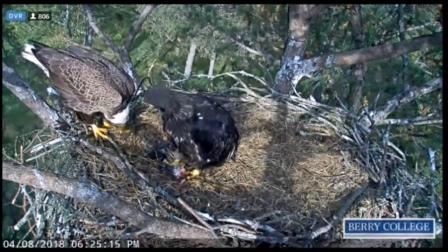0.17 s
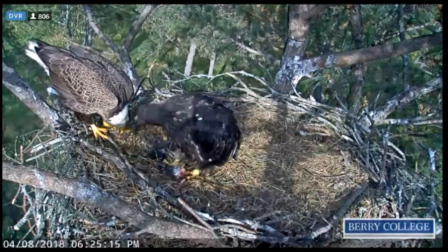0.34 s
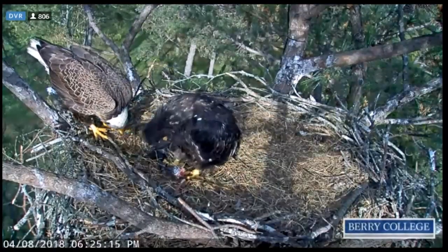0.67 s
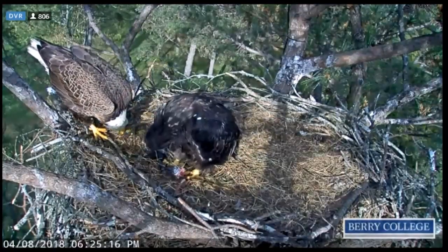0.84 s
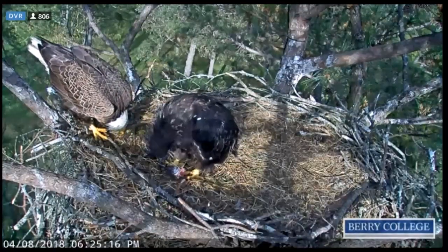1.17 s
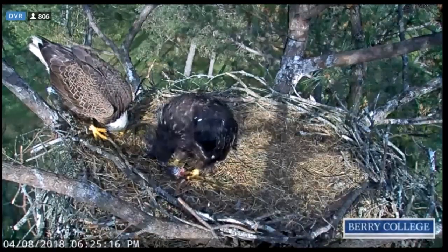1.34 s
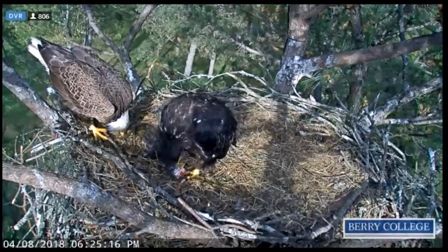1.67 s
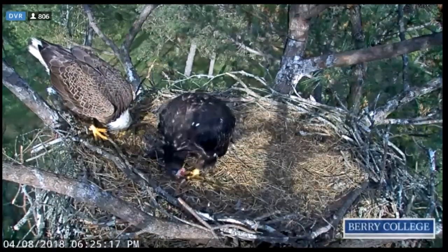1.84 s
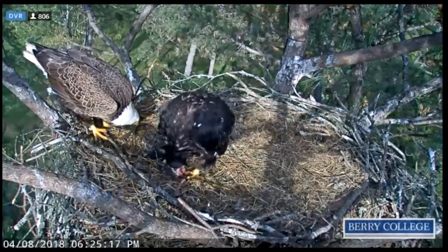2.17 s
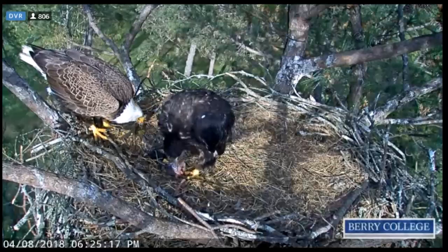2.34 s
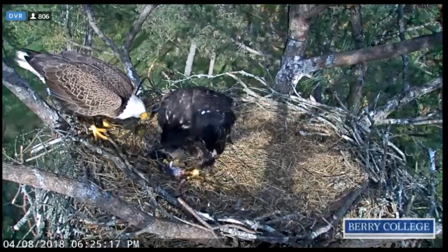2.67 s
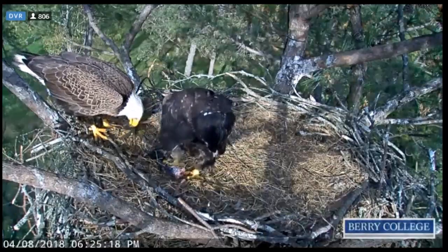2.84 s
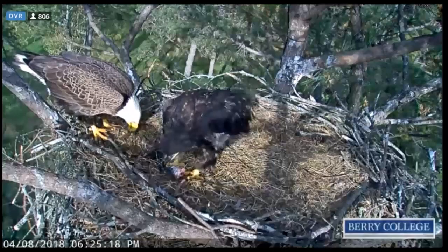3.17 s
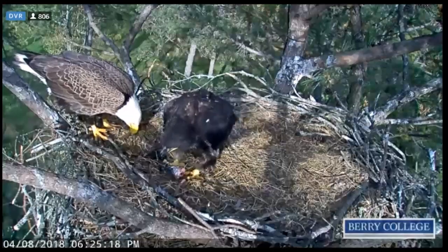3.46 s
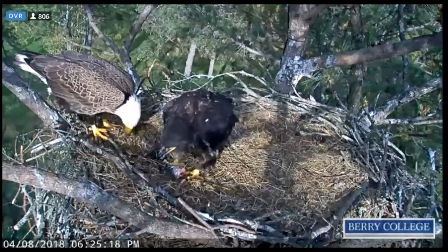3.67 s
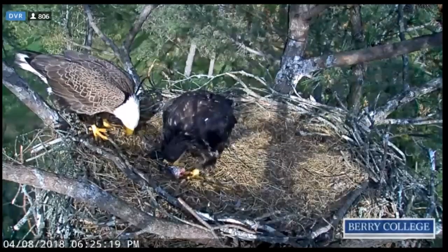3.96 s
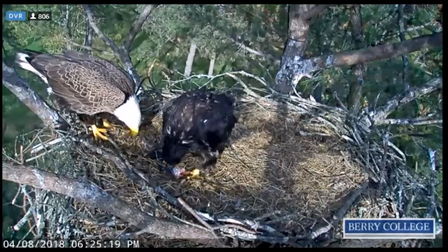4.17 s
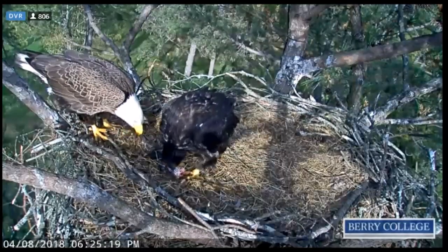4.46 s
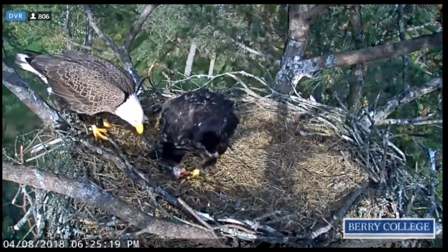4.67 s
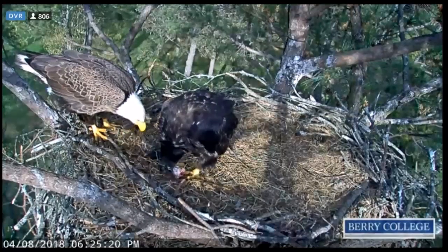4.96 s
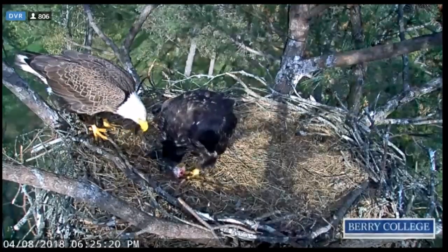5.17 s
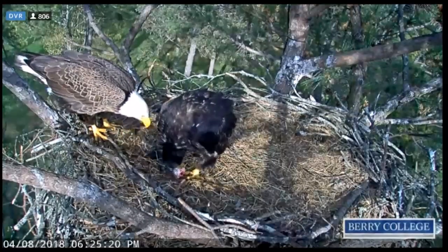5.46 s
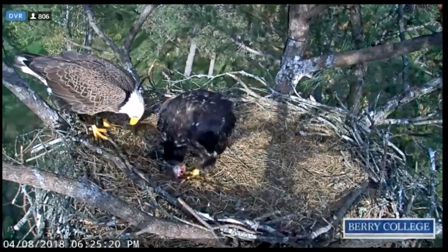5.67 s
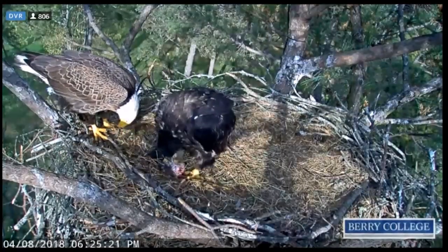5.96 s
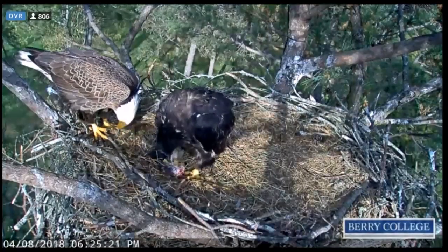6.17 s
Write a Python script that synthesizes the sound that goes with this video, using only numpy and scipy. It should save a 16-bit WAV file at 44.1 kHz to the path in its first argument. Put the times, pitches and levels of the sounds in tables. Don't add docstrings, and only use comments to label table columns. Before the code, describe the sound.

A close, piping eaglet calls twice outdoors: first a long, thin rising squeal with a breathy, broken, loudest ending, then a warbling, rough cry that climbs and chokes off. Wind buffets thud under the first call and ease later. Dry little clicks from beaks and twigs come between and after, over faint road hum, insects and a far small bird. A modest camera microphone, with unsteady treble.

```python
import sys
import numpy as np
from scipy import signal
from scipy.fft import rfft, irfft
from scipy.io import wavfile
from scipy.ndimage import uniform_filter1d

SR = 44100
rng = np.random.default_rng(int(sys.argv[2]) if len(sys.argv) > 2 else 0)


def wav_out(sig):
    wavfile.write(sys.argv[1], SR, np.round(np.clip(np.atleast_2d(sig).T, -1, 1) * 32767).astype(np.int16))


def invert_db(x):
    u = np.asarray(x, float) / 20
    return 10 ** u


N = 277872
T = np.arange(N) / SR
PATCHY_DB = 4
CAMERA_HZ, LEAD_S = 16000, 1 / 100


def rms1(x):
    return x / np.sqrt(np.mean(np.abs(x) ** 2))


def band(x, hz, width):
    return signal.lfilter(*signal.iirpeak(hz, hz / width, fs=SR), x)


def low(x, hz, order=2):
    return signal.sosfilt(signal.butter(order, hz, fs=SR, output="sos"), x)


def walk(hz):
    return rms1(low(rng.standard_normal(N), hz))


def complex_walk(hz, top_hz):
    return rms1(low(walk(hz) + 1j * walk(hz), top_hz))


def moment(s, half_s):
    return np.exp(-((T - s) / half_s) ** 2)


def columns(table, fade=0.0013):
    s, *rest = np.transpose(table)
    gate = np.clip(np.minimum(T - s[0], s[-1] - T) / fade + 1, 0, 1)
    return [np.interp(T, s, c) for c in rest] + [gate]


def turning(hz):
    return np.exp(2j * np.pi * np.cumsum(hz) / SR)


def wind():
    # (time [s], level [dB])
    turbulence = [(0, -48), (0.4, -42.5), (1.0, -50), (1.6, -43), (2.0, -50), (2.5, -55), (2.9, -51.5),
                  (3.16, -59), (3.4, -48), (3.9, -56), (4.5, -56.5), (4.8, -50), (5.05, -58.5),
                  (5.4, -49.5), (6.3, -50.5)]
    # (time [s], peak [dB], swing [Hz])
    gusts = [(-.004, -36.5, 72), (0.084, -30, 39.7), (0.106, -34, 41.3), (0.19, -27.5, 57.6),
             (0.241, -31.5, 50), (0.278, -30, 51.3), (0.397, -29.5, 58), (0.451, -30, 64.6),
             (0.489, -38, 75.5), (0.578, -28.5, 47.3), (0.713, -36.5, 53), (0.805, -36.5, 55.6),
             (0.83, -33, 57.4), (0.905, -33.5, 52), (0.991, -37, 49), (1.107, -30, 64), (1.145, -32, 57.4),
             (1.171, -35.5, 70), (1.405, -26, 46.8), (1.451, -38, 44.2), (1.504, -36.5, 44.1),
             (1.596, -36, 58), (1.65, -28, 47.4), (1.681, -25.5, 63.4), (1.838, -30, 60.5),
             (4.781, -34.5, 50.5), (4.86, -37, 64), (5.417, -37, 55), (5.521, -36, 51.3),
             (5.717, -36.5, 48.4), (6.15, -37.5, 53.7)]
    db, _ = columns(turbulence)
    out = invert_db(db + 1.0 * walk(15)) * rms1(band(low(rng.standard_normal(N), 88), 36, 78))
    for s, peak_db, hz in gusts:
        near = slice(max(int((s - .06) * SR), 0), int((s + .06) * SR))
        t = T[near] - s
        swell = np.exp(-(t * hz / .46) ** 2)
        out[near] += invert_db(peak_db) * swell * np.cos(2 * np.pi * hz * t - 1.8)
    return out


def traffic():
    # (frequency [Hz], level [dB per Hz])
    air = [(53, -31.5), (90, -5), (114, 1), (146, -6.5), (178, -4), (263, -18.5), (442, -23.5), (1020, -16),
           (1740, -31), (2870, -40), (3510, -45.5), (6350, -43), (7500, -43), (9750, -89), (16500, -120)]
    # (time [s], level [dB])
    hum_level = [(0.0, -62), (0.26, -64.5), (4.21, -62), (4.95, -64.5), (6.3, -64)]
    hz, db = np.transpose(air)
    f = np.fft.rfftfreq(N, 1 / SR) + 1
    colour = invert_db(np.interp(np.log(f), np.log(hz), db)) * rfft(rng.standard_normal(N))
    out = 0
    for centre in 80 * 2 ** np.arange(0, 7, .5):
        share = np.clip(1 - np.abs(np.log2(f / centre)) * 2, 0, 1)
        out = out + irfft(colour * share, N) * invert_db(1.1 * walk(3.74))
    hum = irfft(colour * (np.abs(np.log(f / 866)) < .55), N)
    return out / np.std(hum) * invert_db(columns(hum_level)[0])


def drones():
    # (frequency [Hz], width [Hz], level [dB])
    hums = [
        (169.3, 10, -71),
        (2111, 25, -87.5),
        (4070, 400, -91.5),
    ]
    out = 0
    for hz, width, db in hums:
        hum = rms1(band(band(rng.standard_normal(N), hz, width), hz, width))
        out = out + invert_db(db + 1.5 * walk(1.2)) * hum
    return out


def ticks():
    # (time [s], peak [dB], dull part [dB re peak])
    cracks = [(0.0377, -72, -15), (0.1156, -83, -11), (2.9028, -49.5, -8), (2.9047, -60, -6),
              (2.908, -65, -7), (2.963, -67, -10), (3.161, -69, -15), (3.1816, -67, -5), (3.473, -72, -11),
              (3.6775, -74.5, -8), (3.727, -73, -11), (3.9133, -71, -16), (3.95, -87, -12),
              (4.1416, -72, -9), (4.2353, -71, -14), (4.2462, -69, -13), (5.1168, -59, -14),
              (5.334, -72, -8), (5.451, -72, -2), (5.572, -74.5, -2), (5.67, -72, -8), (5.71, -75, -14),
              (5.7658, -75, -5), (5.817, -70, -14), (5.8205, -78, -16), (5.8245, -65, -12),
              (5.827, -71, -12), (5.873, -74, -9), (5.896, -72, -13), (6.0561, -59, -17), (6.06, -68, -15),
              (6.063, -65, -12), (6.067, -64, -10), (6.0718, -50, -10.5), (6.0745, -55.5, -7),
              (6.053, -68, -10), (6.0824, -64, -12), (6.089, -72, -14), (6.264, -63, -29),
              (6.266, -57, -20), (6.289, -70, -10)]
    length = 4096
    out, t = np.zeros(N + length), np.arange(length) / SR
    for s, db, dull_db in cracks:
        decay = np.exp(-np.log(1000) * t / .007) * np.minimum(t / .0001, 1)
        crack = rng.standard_normal(length) * decay
        bright = band(band(crack, 6600, 2200), 6600, 2200)
        dull = band(band(crack, 2400, 2500), 2400, 3000)
        knock = invert_db(dull_db + 0.5) * dull / np.abs(dull).max()
        out[int(s * SR):][:length] += invert_db(db + 11.5) * (bright / np.abs(bright).max() + knock)
    return out[:N]


def membrane_flutter():
    # (from [s], beat [Hz], chaotic share [0-1], sideband [dB])
    states = [(0, 300, .9, -30), (1.96, 250, .55, -15), (2.125, 200, .2, -8), (2.195, 215, .35, -10),
              (2.29, 200, .3, -24), (2.315, 190, .35, -12), (2.4, 200, .3, -30), (4.43, 195, .14, -8.5),
              (4.5, 270, .3, -5.5), (4.555, 190, .32, -4), (4.67, 245, .35, -6.5), (4.79, 270, .45, -14),
              (4.93, 250, .6, -27), (5.085, 250, .95, -3), (5.115, 250, .9, -27)]
    turn_s, pitch_shake = .015, .7
    s, *state = np.transpose(states)
    now = np.searchsorted(s, T, "right") - 1
    beat_hz, chaos, side_db = (uniform_filter1d(c[now], size=int(turn_s * SR)) for c in state)
    beat = turning(beat_hz * (1 + .09 * walk(30)))
    regular = 2 * beat.real + .8 * (beat ** 2).real
    chaotic = 1.7 * complex_walk(480, 750)
    flutter = invert_db(side_db) * (np.sqrt(1 - chaos) * regular + np.sqrt(chaos) * chaotic)
    wobble = (beat * np.exp(1.2j * walk(12))).imag
    sway = np.exp(1j * pitch_shake * invert_db(side_db) * np.sqrt(1 - chaos) * wobble)
    return beat, flutter, sway


def airflow_catches():
    # (time [s], half length [s], high membrane [Hz], low membrane [Hz], shake [dB])
    catches = [(0.663, 0.0048, -62, 0, -35), (0.703, 0.025, 31, -0.5, -40), (0.72, 0.0036, 40, -2.5, -10),
               (0.733, 0.023, -110, -24, -38), (0.787, 0.0056, 1.5, 3, -18), (1.952, 0.047, 21, 0, -36),
               (0.85, 0.032, 160, 0.5, -40), (0.891, 0.0035, -69, 45, -28),
               (0.912, 0.0058, -73.5, -61, -20), (1.013, 0.059, 199, 137, -41),
               (1.111, 0.014, -31.5, -43, -24), (1.198, 0.028, 57, 18.5, -42),
               (1.338, 0.0062, 4.5, -190, -19), (1.281, 0.047, 0, -59, -40), (1.38, 0.011, 3, 2, -25),
               (1.551, 0.0059, 89.5, 110, -22), (1.56, 0.007, -66.5, -62, -23),
               (1.616, 0.04, -165, -140, -44), (1.751, 0.0083, 49.5, 60.5, -30),
               (1.772, 0.006, -33.5, -110, -23), (1.898, 0.0065, 93.5, 2.5, -38),
               (1.931, 0.027, 58, 38.5, -32), (4.919, 0.0044, 0, 271, -35), (4.951, 0.0047, 0, 42, -37)]
    high_bend, low_bend, shake = sum(np.outer([high_hz, low_hz, invert_db(db)], moment(s, half))
                                     for s, half, high_hz, low_hz, db in catches)
    return (high_bend, low_bend), shake * 1.7 * complex_walk(260, 300)


def membrane_chokes():
    # (time [s], half length [s], high membrane [dB], low membrane [dB])
    chokes = [(0.704, 0.0053, -3, -2), (0.737, 0.0055, 4, -7), (0.792, .015, 1, 1), (1.178, 0.012, -3, 1.5),
              (1.28, 0.013, 4, -1), (1.32, 0.009, 0, -2), (1.384, 0.0066, -7, 3), (1.458, 0.0087, -2, 4),
              (1.54, 0.0075, 1.5, -6), (1.765, 0.0063, -2, -4), (1.874, 0.01, -13, 4),
              (2.119, 0.0027, -12, -4), (2.308, 0.0035, 0, -9), (4.66, 0.0045, 0, -8)]
    return sum(np.outer([high_db, low_db], moment(s, half)) for s, half, high_db, low_db in chokes)


def voice(table, flutter, bend_hz, sway, choke_db=0):
    hz, db, octave_db, gate = columns(table)
    waver = 1 + .0024 * walk(90) + .0012 * walk(25)
    swing = sway * turning((hz + bend_hz) * waver)
    size = gate * invert_db(choke_db + 0.91 * walk(54))
    tone = invert_db(db + 4.5) * size * (1 + flutter)
    octave = invert_db(octave_db + 10.5 + PATCHY_DB / 2 * walk(20)) * size * (1 + invert_db(-1.5) * flutter)
    return swing, tone, octave


def membrane_pair(high_notes, low_notes, flutter, bends, sway, chokes):
    # (time [s], level [dB under the pair])
    upper = [(.6, -25), (1.2, -21.5), (1.75, -20.5), (1.88, -10), (1.97, -14), (2.02, -21)]
    sum_db = -15
    high, loud, octave = voice(high_notes, flutter, bends[0], sway, chokes[0])
    deep, deep_loud, deep_octave = voice(low_notes, flutter, bends[1], sway, chokes[1])
    sum_tone = invert_db(sum_db + PATCHY_DB * walk(14)) * high * deep
    upper_tone = invert_db(columns(upper)[0] + PATCHY_DB / 2 * walk(7.1)) * high ** 2 / deep
    mixed = np.sqrt(np.abs(loud * deep_loud)) * (sum_tone + upper_tone)
    return loud * high + octave * high ** 2 + deep_loud * deep + deep_octave * deep ** 2 + mixed


def breath_rasp(beat):
    # (frequency [Hz], width [Hz], level [dB])
    throat = [(2140, 500, -8), (3680, 1800, -10), (5470, 640, -3), (7130, 1150, 0)]
    # (start [s], end [s], hiss [dB], centre of whistle [Hz], whistle [dB])
    puffs = [(1.302, 1.422, -89, 5160, -98), (1.554, 1.76, -86.5, 6300, -98),
             (1.762, 1.895, -77, 6150, -80), (1.903, 1.972, -82, 6460, -74.5),
             (1.967, 1.994, -70, 6430, -64), (1.989, 2.084, -63.5, 6510, -66.5),
             (2.081, 2.137, -64.5, 6040, -63.5), (2.141, 2.21, -63, 7100, -84),
             (2.221, 2.292, -62.5, 6200, -72), (2.318, 2.336, -61, 5980, -60),
             (2.287, 2.394, -72, 6380, -74), (1.977, 2.024, -93, 6190, -74.5),
             (2.112, 2.163, -84, 7060, -66), (2.276, 2.29, -76, 5650, -66), (2.394, 2.47, -77, 6900, -95),
             (4.253, 4.263, -92, 5980, -71), (4.442, 4.696, -76.5, 5175, -97),
             (4.703, 5.0, -73, 5150, -106), (5.08, 5.14, -69.5, 6850, -78)]
    fade_s = 0.015
    noise = rng.standard_normal(N)
    hiss = rms1(sum(invert_db(db) * band(band(noise, hz, width), hz, width) for hz, width, db in throat))
    pulse = invert_db(1.2 * walk(260) + .8 * walk(25)) * (1 + .3 * beat.real)
    slack = rms1(1.6 + walk(190) + 1j * walk(190))
    rasp = 0
    for start, end, hiss_db, hz, whistle_db in puffs:
        gate = np.clip(np.minimum(T - start, end - T) / fade_s + .5, 0, 1)
        whistle = invert_db(whistle_db + 6.0) * slack * np.exp(2j * np.pi * hz * T)
        rasp = rasp + gate * (invert_db(hiss_db) * hiss + whistle)
    return rms1(pulse) * rasp


def eagle():
    rise_high = [(.6, 2950, -79, -98), (.645, 3220, -68.5, -76), (.92, 3490, -77.5, -83),
                 (1.29, 3730, -74, -82), (1.37, 3860, -61, -75), (1.5, 4135, -61.5, -95),
                 (1.86, 4176, -65, -100), (2.08, 4540, -64, -83), (2.118, 4354, -58, -78)]
    rise_low = [(.635, 2655, -95, -103), (0.647, 2770, -68.5, -94.5), (.905, 2940, -67.5, -91),
                (1.18, 3000, -70.5, -91), (1.21, 3170, -69, -96), (1.529, 3560, -69, -78.5),
                (1.839, 3710, -68.5, -100), (1.99, 4047, -67, -86), (2.061, 4307, -56, -88)]
    break_low = [(2.126, 4075, -62, -62), (2.198, 4016, -57.5, -66), (2.206, 3900, -53, -68),
                 (2.285, 4040, -58, -63), (2.309, 4054, -44.5, -84), (2.314, 3700, -55, -73),
                 (2.325, 3610, -61, -51), (2.352, 3580, -56, -55), (2.363, 3800, -66, -78)]
    slip_high = [
        (2.358, 4010, -54, -90),
        (2.368, 4060, -55, -85),
        (2.414, 4160, -54.5, -85),
        (2.421, 3950, -70, -90),
    ]
    fall_low = [(2.395, 3890, -50, -85), (2.415, 3886, -50.5, -69), (2.428, 3760, -50, -69),
                (2.441, 3680, -50, -85), (2.459, 3613, -49, -71), (2.473, 3530, -49, -69),
                (2.492, 3187, -49.5, -56), (2.503, 3093, -63, -81)]
    warble = [(4.277, 3186, -92, -75), (4.28, 3236, -91, -55.5), (4.284, 3380, -90, -59),
              (4.292, 3220, -82, -53), (4.297, 3030, -82, -72), (4.306, 3190, -85, -65),
              (4.315, 3255, -78, -68), (4.33, 3170, -74, -77), (4.355, 3303, -72.5, -68),
              (4.361, 3195, -76, -69), (4.37, 3260, -82, -69.5), (4.378, 3310, -83, -61),
              (4.409, 3400, -79, -72.5), (4.412, 3256, -86, -66.5), (4.429, 3286, -94, -69),
              (4.434, 3285, -100, -89)]
    strands = [(4.52, 3504, -99, -86), (4.535, 3506, -81, -69), (4.55, 3625, -83, -75),
               (4.57, 3680, -97, -92), (4.665, 3517, -97, -89), (4.69, 3510, -88, -73),
               (4.71, 3510, -83, -71), (4.744, 3514, -82, -77), (4.78, 3520, -97, -87)]
    wisp = [
        (4.855, 3800, -98, -110),
        (4.872, 3880, -84, -105),
        (4.906, 3866, -73, -105),
        (4.932, 3800, -76, -105),
        (4.944, 3870, -101, -110),
    ]
    swell = [(4.306, 2740, -79, -100), (4.358, 3000, -74, -96), (4.364, 3007, -92, -100),
             (4.374, 2944, -74, -98), (4.395, 2825, -77, -98), (4.42, 2930, -78, -98),
             (4.428, 3050, -64, -78), (4.44, 3083, -59.5, -69.5), (4.47, 3103, -60.5, -69),
             (4.49, 3117, -66, -66.5)]
    crest = [(4.512, 3213, -63, -68.5), (4.535, 3225, -70.5, -71), (4.55, 3410, -69.5, -70.5),
             (4.575, 3476, -66, -63), (4.6, 3443, -68, -60), (4.635, 3385, -75, -71),
             (4.66, 3374, -68, -73), (4.675, 3290, -73.5, -70), (4.712, 3235, -72, -71)]
    lull = [
        (4.74, 3255, -73.5, -77),
        (4.785, 3335, -70.5, -71.5),
    ]
    climb = [(4.812, 3270, -70.5, -60), (4.836, 3455, -60, -61), (4.85, 3380, -70, -61),
             (4.866, 3452, -72, -65), (4.908, 3430, -62.5, -62.5), (4.92, 3430, -59, -68),
             (4.931, 3484, -60, -61.5), (4.94, 3407, -61.5, -60.5), (4.979, 3495, -64.5, -57.5)]
    peak = [(5.004, 3544, -61.5, -57), (5.02, 3607, -58.5, -54.5), (5.039, 3694, -57.5, -58.5),
            (5.066, 3670, -58, -57.5), (5.075, 3924, -61.5, -75), (5.09, 3975, -66.5, -80),
            (5.104, 3896, -69.5, -76), (5.113, 3790, -68, -80), (5.12, 3854, -61, -70)]
    close = [(5.131, 3870, -62, -74), (5.138, 3470, -59.5, -70), (5.15, 3398, -61.5, -75),
             (5.163, 3410, -61, -87), (5.184, 3387, -61, -79), (5.2, 3418, -57, -80),
             (5.232, 3380, -60, -78), (5.255, 3110, -55, -63.5), (5.266, 2980, -72.5, -79)]
    gasp = [
        (5.2675, 2800, -71, -77),
        (5.271, 2990, -63.5, -76),
        (5.273, 2900, -84, -92),
        (5.2755, 2530, -72, -95),
        (5.281, 2450, -78, -100),
    ]
    beat, flutter, sway = membrane_flutter()
    bends, shake = airflow_catches()
    flutter = flutter + shake
    shaken = (flutter, bends, sway, membrane_chokes())
    swing, tone, _ = voice(slip_high, 0, 0, 1.0)
    first = membrane_pair(rise_high, rise_low + break_low + fall_low, *shaken)
    second = membrane_pair(warble + strands + wisp,
                           swell + crest + lull + climb + peak + close + gasp, *shaken)
    return (tone * swing + first + second + breath_rasp(beat)).real


def far_bird():
    # (start [s], length [s], from [Hz], to [Hz], loudest [dB])
    notes_sung = [
        (2.97, .17, 2350, 3120, -85),
        (5.54, .07, 2250, 2600, -84),
        (5.68, .12, 2970, 2870, -81.5),
        (4.975, .075, 2885, 2865, -76),
        (5.04, .085, 2870, 2900, -79),
        (6.22, .025, 6600, 6150, -84),
        (2.494, .016, 2350, 2250, -74),
    ]
    out = 0
    for s, length, from_hz, to_hz, db in notes_sung:
        along = np.clip((T - s) / length, 0, 1)
        glide = turning(from_hz + (to_hz - from_hz) * along).real
        out = out + invert_db(db + 4 + 2 * walk(30)) * np.sin(np.pi * along) * glide
    return out


def scene():
    bed = wind() + traffic() + drones()
    near = ticks()
    call = eagle()
    t = np.arange(8192) / SR
    branches = rng.standard_normal(8192) * np.exp(-np.log(1000) * t / .2) * (t > .008)
    branches = invert_db(-21) * branches / np.linalg.norm(branches)
    scatter = signal.fftconvolve(call + invert_db(-5.5) * near, branches)[:N]
    return (call + near + scatter + far_bird() + bed)[None]


def camera_rounding(x):
    frame, frame_start, first_bin = 1024, 496, 260
    band_ratio = 1.076
    step_db, beside_db = -9, -4
    up_db, down_db = -4.5, -8
    sudden_db = 14
    pad = 2 * frame - frame_start
    wide = np.pad(x, (pad, 3 * frame))
    n, k = np.arange(2 * frame), np.arange(first_bin, frame)
    window = np.sin(np.pi * (n + .5) / (2 * frame))
    basis = window[:, None] * np.cos(np.pi / frame * np.outer(n + .5 + frame / 2, k + .5))
    frames = np.lib.stride_tricks.sliding_window_view(wide, 2 * frame)[::frame]
    lines = frames @ basis
    which = (np.log(k / first_bin) / np.log(band_ratio)).astype(int)
    bands = np.arange(which[-1] + 1)
    member = which[:, None] == bands
    level_db = 10 * np.log10(lines ** 2 @ member / member.sum(axis=0) + 1e-18)
    apart = np.subtract.outer(bands, bands)
    slope_db = np.where(apart > 0, up_db, -down_db) * apart
    hidden_db = np.where(apart == 0, step_db, beside_db + slope_db)
    step = invert_db((level_db[:, None] + hidden_db).max(axis=2))[:, which]
    whole = np.floor((np.abs(lines) / step) ** .75 + .4054)
    rounded = np.sign(lines) * step * whole ** (4 / 3)
    treble = np.diff(frames, 4, prepend=np.zeros((len(frames), 4))) ** 2
    bits = treble.reshape(len(frames), 16, -1).sum(axis=2)[:, 1:]
    steady = bits.max(axis=1) < invert_db(2 * sudden_db) * np.median(bits, axis=1)
    error = (rounded - lines) * steady[:, None] @ basis.T * 2 / frame
    return x + (error[:-1, frame:] + error[1:, :frame]).ravel()[pad - frame:][:len(x)]


def camera_dropouts(x):
    drops = [1.928, 2.397, 2.548, 2.761, 2.805, 3.186, 3.42, 3.508, 4.83, 4.98, 5.256]
    f, t, z = signal.stft(x, CAMERA_HZ, "hann", 320)
    power = uniform_filter1d(np.abs(z) ** 2, size=5, axis=0) + 1e-18
    when = sum(np.abs(t - LEAD_S - s) < .009 for s in drops)
    starved = when * invert_db(-166) * np.clip(f / 1500 - .8, 0, 1)[:, None]
    keep = .12 + .88 / (1 + (starved / power) ** 2)
    return signal.istft(z * keep, CAMERA_HZ, "hann", 320)[1][:len(x)]


def low_pass(x):
    return signal.sosfilt(signal.butter(12, 15400, fs=SR, output="sos"), x)


def record(dry):
    running = np.pad(dry[0], (SR // 100, 0), "edge")
    slow = signal.resample_poly(low(running, 7360, order=10), CAMERA_HZ // 100, SR // 100)
    slow = camera_dropouts(camera_rounding(slow))[CAMERA_HZ // 100:]
    x = np.interp(T, np.arange(len(slow)) / CAMERA_HZ, slow)
    mix = (x + invert_db(-99) * rng.standard_normal(N))[None]
    return low_pass(mix)


dry = scene()
out = record(dry)
wav_out(out)
```